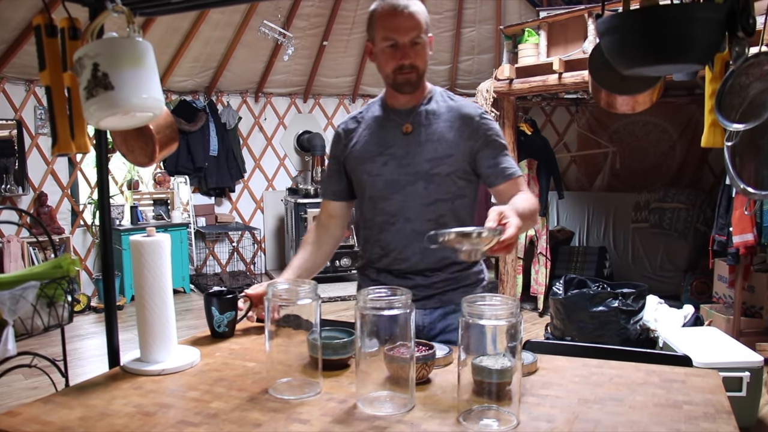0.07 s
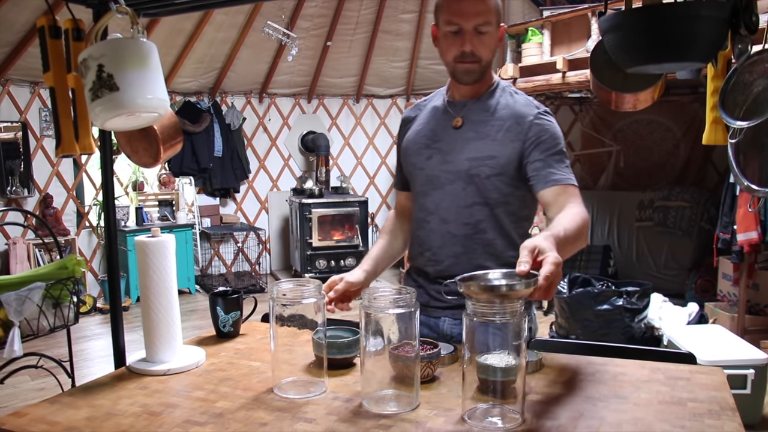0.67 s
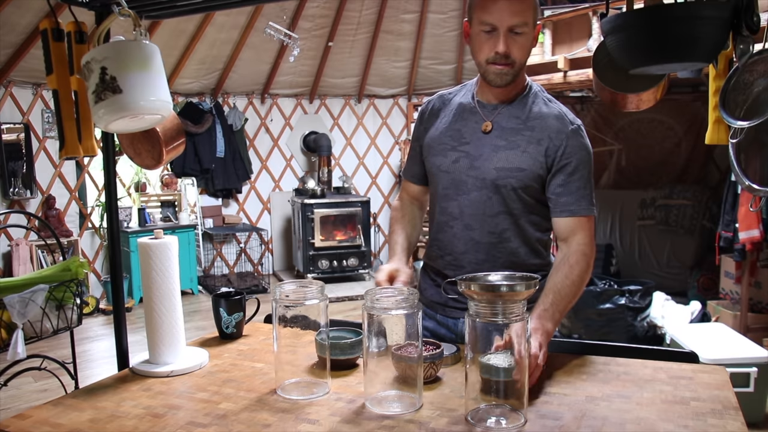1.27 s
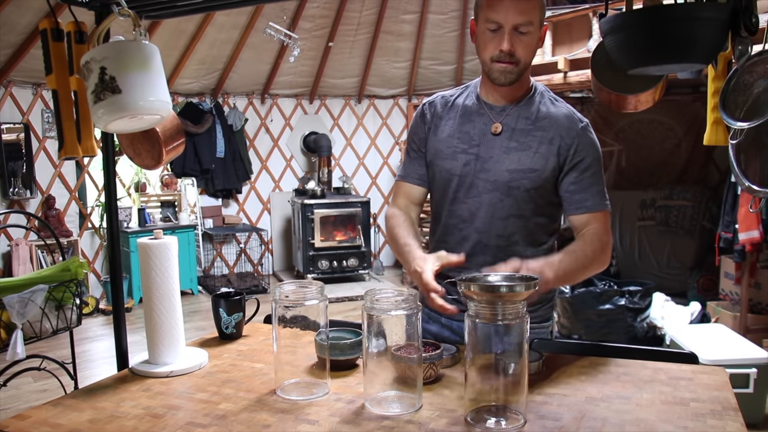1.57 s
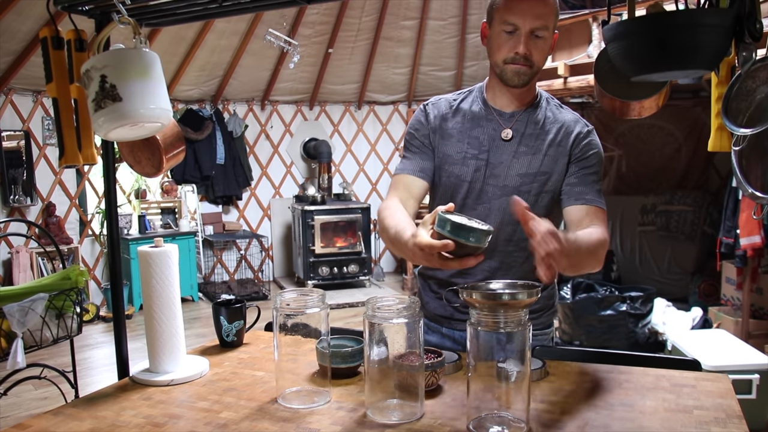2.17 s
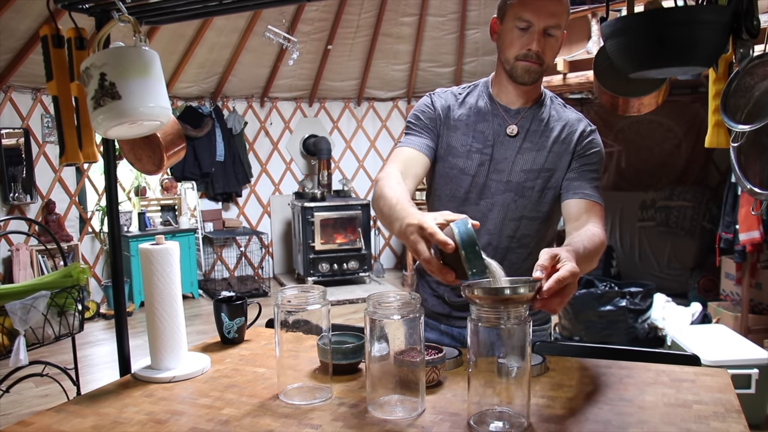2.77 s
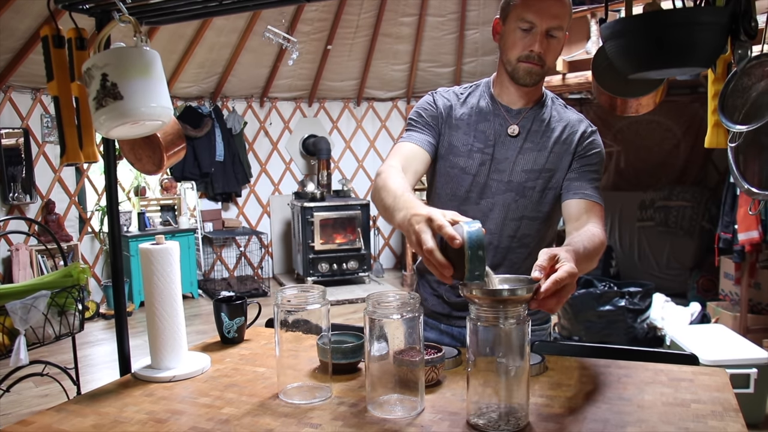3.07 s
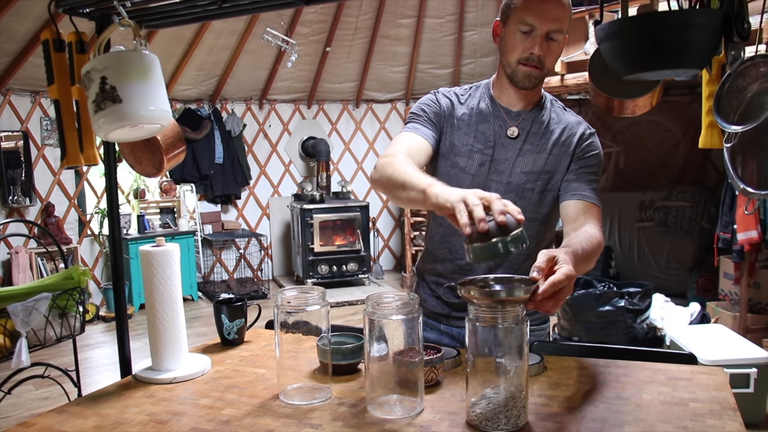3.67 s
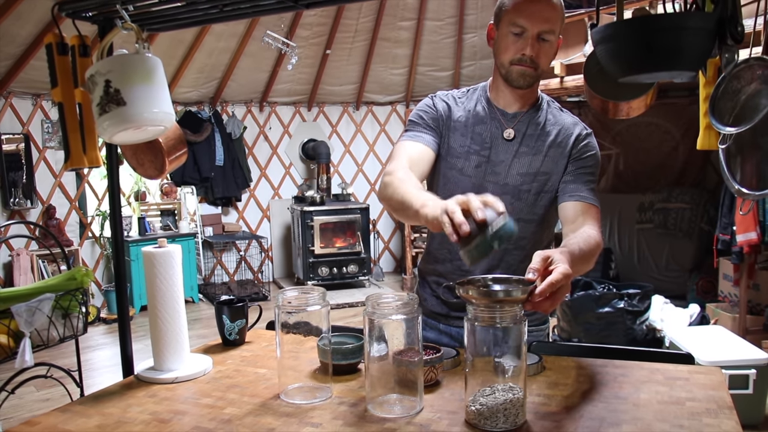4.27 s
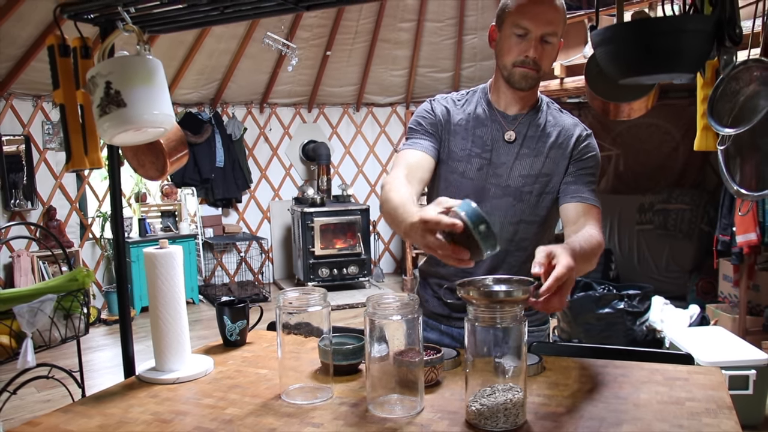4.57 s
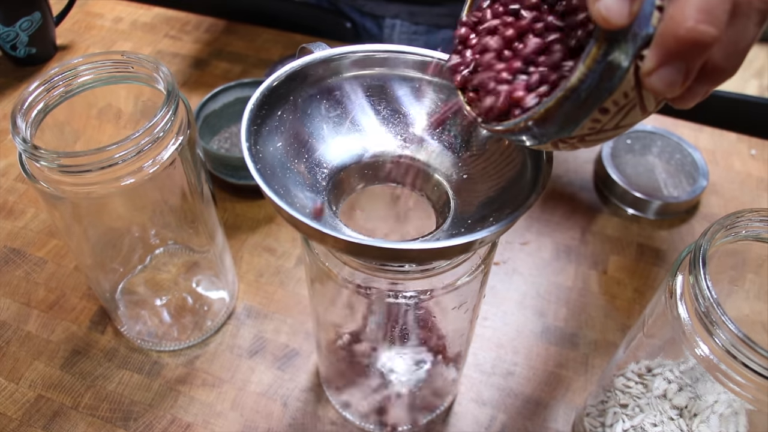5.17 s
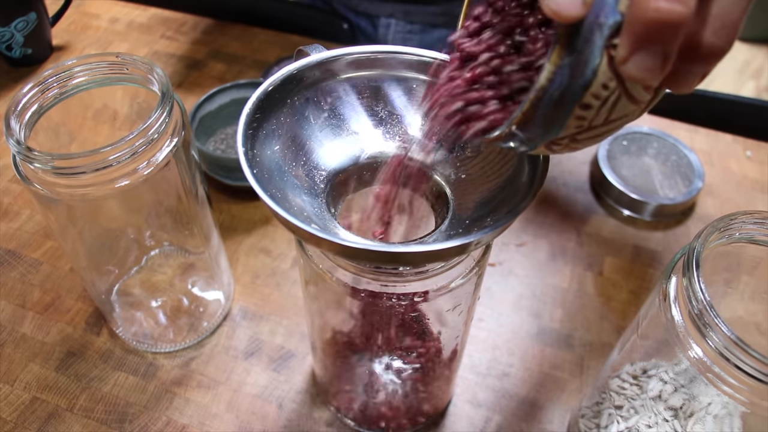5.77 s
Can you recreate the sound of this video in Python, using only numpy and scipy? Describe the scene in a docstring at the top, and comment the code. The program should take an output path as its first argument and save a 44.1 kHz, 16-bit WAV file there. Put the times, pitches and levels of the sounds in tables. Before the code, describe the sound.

A low, even hush fills a small kitchen with little echo, and a few faint bumps and ticks come from things being handled. At about 0.65 seconds a steel funnel drops onto a glass jar, ringing and rattling to rest by 0.9. A very faint squeak follows around 1.1. At 2.6 the funnel knocks again, and light seeds pour through it in a soft, bright rush, ticking on steel and glass. A weaker second tip comes at 3.4, thinning to single ticks until 4.4. Around 4.5 a bowl bumps lightly, and hard dried beans begin sliding over each other. From 4.8 they pour through the funnel, close up and by far the loudest sound, a dense clatter that rings the metal and drums on the bottom of the jar until about 5.8 seconds.

```python
"""A kitchen, small and soft, with one microphone and a limiter near a glass jar on a wooden table.
After a few handling bumps a steel funnel drops into the jar's mouth and rattles to rest; a faint squeak
follows. The funnel knocks again, light seeds are tipped through it from a bowl and the last ones shaken
out. Then, close up, hard dried beans slide off a bowl and pour in.
The grains give short cracks and ring funnel and jar."""
import sys
import numpy as np
from scipy import signal
from scipy.fft import rfft, irfft, next_fast_len
from scipy.io import wavfile
from scipy.ndimage import uniform_filter1d, minimum_filter1d

SR = 44100
rng = np.random.default_rng(int(sys.argv[2]) if len(sys.argv) > 2 else 0)


def generate_wav(signal):
    """Clip the signal to [-1, 1] and save it as 16-bit WAV at the path in sys.argv[1]."""
    frames = np.transpose(np.atleast_2d(signal))
    scaled = np.clip(frames, -1, 1) * 32767
    pcm = np.round(scaled).astype(np.int16)
    wavfile.write(sys.argv[1], SR, pcm)


N = 256662
TIME = np.arange(N) / SR
AGE = TIME[:SR // 2]  # seconds since a strike
BLOW_S = 0.01
FALL_S = 0.12  # from the funnel to the bottom of the jar


def amp(db):
    """Decibels to gain."""
    return 10 ** (np.asarray(db) / 20)


def add(out, t, sound):
    """Mix a sound in at t seconds."""
    i = int(np.clip(round(t * SR), 0, N - 1))
    out[i:i + len(sound)] += sound[:N - i]


def blow(x):
    """Scale to the energy of a full-level sound lasting BLOW_S."""
    return x * np.sqrt(BLOW_S * SR / np.sum(x ** 2, axis=-1, keepdims=True))


def colour(x, spectrum):
    """Causal filter through (f/Hz, level/dB) points, built from the cepstrum."""
    size = next_fast_len(x.shape[-1] // 2 + 2048) * 2
    hz, db = np.transpose(spectrum)
    bins = np.maximum(np.arange(size // 2 + 1) * SR / size, 1)
    gain = amp(np.interp(np.log(bins), np.log(hz), db))
    cepstrum = irfft(np.log(gain))
    cepstrum[1:size // 2] *= 2
    cepstrum[size // 2 + 1:] = 0
    return irfft(rfft(x, size) * np.exp(rfft(cepstrum)))[..., :x.shape[-1]]


def fade(t60):
    """Exponential decay, 60 dB down after t60 seconds."""
    return np.exp(-np.log(1000) * AGE / t60)


def cracks(spectrum, t60, count):
    """Crowds of short modes, different at each point of contact."""
    return blow(colour(rng.standard_normal((count, len(AGE))) * fade(t60), spectrum))


def partials(modes):
    """One dying sine a mode; its level sets its share of the energy."""
    return np.array([amp(db) * blow(np.sin(2 * np.pi * hz * AGE) * fade(t60)) for hz, t60, db in modes])


def rings(modes, scatter_db, count):
    """Each point of contact moves the modes with its own signs and strengths."""
    sign, strength = rng.standard_normal((2, count, len(modes)))
    weights = np.sign(sign) * amp(scatter_db * strength)
    return blow(weights @ partials(modes) * (1 - fade(0.012)))  # the ring takes a moment to spread


def pings(low_hz, high_hz, t60, count):
    """Short, bright tones, a different three at each point of contact."""
    hz = rng.uniform(low_hz, high_hz, (count, 3))
    return blow(np.sin(2 * np.pi * hz[..., None] * AGE).sum(axis=1) * fade(t60))


def shower(flow, banks, spread_db, per_second):
    """A stream of uneven grains; each level column of the flow plays one bank of sounds."""
    s, *levels = np.transpose(flow)
    grains = int((s[-1] - s[0]) * per_second)
    late, chance, spots = rng.random((grains, 3)).T
    times = s[0] + (np.arange(grains) + 2 * late - 1) / per_second
    sizes = amp(-spread_db * np.log(1 - 0.98 * chance))  # many small, a few large
    sizes /= np.sqrt(np.mean(sizes ** 2) * per_second * BLOW_S)
    out = np.zeros(N)
    for t, size, spot in zip(times, sizes, spots):
        for db, bank in zip(levels, banks):
            add(out, t, size * amp(np.interp(t, s, db)) * bank[int(spot * len(bank))])
    return out


def strikes(hits, crack, ring):
    """Single grains hit the bare steel; the level is shared between crack and ring."""
    out = np.zeros(N)
    for k, (t, db, ring_db, *_) in enumerate(hits):
        sound = crack[k % len(crack)] + amp(ring_db) * ring[k % len(ring)]
        add(out, t, amp(db) * sound / np.hypot(1, amp(ring_db)))
    return out


def room_tone():
    """The low, even hush of the kitchen."""
    # colour of the hush: f/Hz, level/dB
    spectrum = [(15, -64), (25, -42), (114, -7.5), (185, -10), (249, -3), (335, -8), (384, -11.5),
                (503, -7.5), (624, -9.5), (754, -13), (863, -15.5), (1330, -25), (4030, -24.5),
                (4870, -31.5), (16000, -39.5)]
    hush = colour(rng.standard_normal(N), spectrum)
    return amp(-65) * hush / np.std(hush)


def room(x):
    """Cloth walls give a short, soft tail behind the direct sound."""
    spectrum = [(60, -8.5), (400, -4), (4000, 5), (16000, -8.5)]  # f/Hz, level/dB
    tail = cracks(spectrum, t60=0.36, count=1)[0] * (1 - fade(0.02))
    return x + amp(-8.5) * signal.fftconvolve(x, tail / np.linalg.norm(tail))[:N]


def squeak():
    """A short rub turns into a faint, unsteady, rising tone."""
    # course of the tone: t/s, f/Hz, level/dB
    glide = [(1.07, 2620, -71), (1.09, 2680, -69), (1.116, 2680, -80), (1.136, 2750, -61),
             (1.185, 2940, -86)]
    # colour of the rub: f/Hz, level/dB
    rub = [(200, -16), (1100, -16), (1450, 0), (1900, -15), (2600, -14), (5000, -32)]
    s, hz, db = np.transpose(glide)
    wobble = uniform_filter1d(rng.standard_normal(N), size=100)
    pitch = np.interp(TIME, s, hz) * (1 + 0.022 * wobble / np.std(wobble))
    level = np.interp(TIME, s, amp(db), left=0, right=0)
    out = np.sqrt(2) * level * np.sin(2 * np.pi * np.cumsum(pitch) / SR)
    add(out, s[0], amp(-48) * cracks(rub, t60=0.17, count=1)[0] * (1 - fade(0.08)))
    return out


def handling():
    """Soft bumps and small ticks as bowls are picked up, shaken and tilted."""
    # hands and bowls bump: t/s, level/dB, centre f/Hz
    bumps = [(.086, -47, 198), (0.119, -45, 112), (0.159, -49, 364), (1.289, -50.5, 426),
             (2.549, -49.5, 497), (3.802, -51.5, 704), (3.903, -43.5, 600), (4.272, -48, 644),
             (4.514, -45, 320), (4.566, -47, 453)]
    # bowls tick: t/s, level/dB, treble tilt/(dB per octave)
    ticks = [(0.085, -47.5, -12), (0.259, -60.5, -8.5), (0.356, -61.5, -7), (.447, -58.5, 4),
             (.99, -60, -8.5), (1.241, -65.5, 0.5), (1.639, -67, -4.5), (2.027, -59, 2), (2.042, -57, -0.5),
             (2.536, -62, -1), (2.549, -62, 6), (4.511, -43, -6.5), (4.566, -44.5, -6), (4.58, -26, 26)]
    # colour of a tick before its tilt: f/Hz, level/dB
    tick_colour = [(100, -26), (1200, -2.5), (3500, 6.5), (8000, -2.5), (16000, -20)]
    out = np.zeros(N)
    for t, db, hz in bumps:
        spectrum = [(hz / 16, -28), (hz, 0), (hz * 64, -63)]  # a broad hump, steeper above
        add(out, t, amp(db) * cracks(spectrum, t60=0.15, count=1)[0])
    for t, db, tilt in ticks:
        spectrum = [(hz, level + tilt * np.log2(hz / tick_colour[0][0])) for hz, level in tick_colour]
        add(out, t, amp(db) * cracks(spectrum, t60=0.076, count=1)[0])
    return out


def funnel():
    """The funnel bounces on the rim: the jar thuds on the table, steel scrapes glass, both ring on."""
    # knocks on the rim, each column on its own scale: t/s, ring/dB, thud/dB, scrape/dB
    knocks = [(0.653, -9, -12, -27), (0.671, -21, -29, -36), (0.684, -8.5, -17.5, -30.5),
              (0.697, -37, -18, -51), (0.736, -26, -26.5, -44), (0.758, -27, -35, -47),
              (0.775, -22, -24.5, -48), (0.82, -24, -48, -45), (0.833, -22.5, -26, -53.5),
              (0.856, -55, -38, -54), (2.566, -41, -26.5, -49.5), (2.584, -21, -28, -46),
              (2.636, -54, -24, -31.5)]
    # modes of the funnel loose on the jar: f/Hz, t60/s, level/dB
    modes = [(260, 0.69, -7.5), (278.5, 0.52, -4.5), (306, .25, -4.5), (342, .4, -13), (492, 0.31, -8.5),
             (793, 0.18, -11.5), (1210, 0.18, -15.5), (1737, 0.69, 3.5), (2040, .25, -14.5),
             (2121, 0.23, -11), (2925, .6, -20), (3043, 1.8, -6), (3120, 1.8, -3), (3173, 1, -12),
             (4470, 3, -20.5), (5981, .4, -19.5), (6200, 1.5, -26), (6930, 0.32, -21), (7000, .4, -20.5),
             (8102, .3, -21.5)]
    # colours of the dense, quickly dying modes: f/Hz, level/dB
    thud_colour = [(25, -50.5), (70, -23), (110, -29), (190, -30.5), (280, 7), (420, -3), (620, -11.5),
                   (1250, -9.5), (2300, -19), (3600, -21.5), (5000, -42)]
    scrape_colour = [(1500, -15), (3200, -4.5), (5000, -19), (6500, 2), (7400, -9.5), (8300, 1.5),
                     (11000, -3), (16000, -5)]
    seated_s, seated_t60_s = 0.79, 0.33
    ring = blow(partials(modes).sum(axis=0))
    thud = cracks(thud_colour, t60=0.089, count=16)
    scrape = cracks(scrape_colour, t60=0.089, count=16)
    out = np.zeros(N)
    for k, (t, ring_db, thud_db, scrape_db) in enumerate(knocks):
        # once seated, the funnel lies against the glass and its ring dies sooner
        seated_for = np.maximum(AGE - max(seated_s - t, 0), 0)
        damping = amp(-60 * seated_for / seated_t60_s)
        contact = amp(thud_db - 8.5) * thud[k] + amp(scrape_db - 1) * scrape[k]
        add(out, t, contact + amp(ring_db - 9) * ring * damping)
    return out


def seed_flow(start, length, db, steel_db, glass_db):
    """One tip of the bowl swells, runs out and stops; rows of t/s, crack/dB, steel/dB, glass/dB."""
    attack_s, release_s, run_out_db_per_s = 0.034, 0.23, 9.5
    off_wall_db_per_s = 2  # the stream moves from the funnel's wall towards its throat
    bare_s, cover_db_per_s = 0.32, 38  # seeds ring the glass until they heap up on it
    age = np.linspace(0, length, 200)
    opening = np.clip(np.minimum(age / attack_s, (length - age) / release_s), 0.01, 1)
    flow = db - run_out_db_per_s * age + 20 * np.log10(opening)
    steel = flow + steel_db - off_wall_db_per_s * age
    landing = np.interp(age - FALL_S, age, flow)
    glass = landing + glass_db - cover_db_per_s * np.maximum(age - bare_s, 0)
    return np.column_stack([start + age, flow, steel, glass])


def seeds():
    """A fine rush of light seeds, on the steel, then on the glass below; it thins to single ticks."""
    # two tips of the bowl: t/s, length/s, flow/dB, share on steel/dB, share on glass/dB
    tips = [(2.64, 0.87, -27, -6, -4.5), (3.421, 0.38, -34.5, -4, -7)]
    # clumps, then the last seeds shaken loose: t/s, relative level/dB, ring over crack/dB
    hits = [(2.654, -20, -2), (2.672, -24, -7), (2.7232, -33, -27), (2.7454, -13, -30), (2.7613, -11.5, 1),
            (2.8095, -14, -31), (3.0813, -25, -19), (3.1178, -30, -3), (3.1358, -22, -24), (3.4773, -17, 1),
            (3.5127, -18, 4), (3.5364, -20.5, 8), (3.6472, -19.5, 10), (3.7146, -23.5, 8),
            (3.7933, -21.5, -1), (3.8322, -17, 1.5), (3.8724, -27, 14), (3.903, -29, 5), (3.9217, -19, -10),
            (3.9813, -37, 12), (4.0044, -40, 15), (4.055, -30, -6), (4.0822, -24.5, 4), (4.0946, -22, -3),
            (4.1449, -22.5, -1), (4.1795, -37, -1), (4.3907, -32, 3), (4.4164, -56, -9)]
    # colour of a seed's crack: f/Hz, level/dB
    crack_colour = [(25, -49), (90, -46), (300, -15), (1000, -14), (2500, -17), (3600, -11.5), (4400, -13),
                    (5400, -15.5), (6700, -3.5), (7500, -9), (8400, 1), (10000, 0.5), (12000, -2),
                    (16000, -5.5)]
    # modes of the hand-held funnel and of the jar: f/Hz, t60/s, level/dB
    funnel_modes = [(324, 0.081, -22), (501, 0.1, -23), (1508, 0.045, -12), (1753, 0.22, -19),
                    (2187, 0.03, -10), (3095, 0.06, -6), (3156, 0.089, -7), (5672, 0.027, -17),
                    (5977, 0.108, -12), (6264, 0.025, -4), (6551, 0.116, -11), (7002, 0.023, -11),
                    (8038, 0.06, 0), (8332, 0.025, -9), (9450, 0.15, -15), (10489, 0.086, -16),
                    (12100, 0.041, -10), (13117, 0.072, -9), (15618, 0.037, -12)]
    jar_modes = [(2925, 0.15, 0), (4773, 0.061, -11), (4948, 0.03, -14), (5092, 0.049, -12)]
    crack = cracks(crack_colour, t60=0.049, count=40)
    steel = amp(3) * rings(funnel_modes, scatter_db=1.5, count=40)
    glass = rings(jar_modes, scatter_db=0, count=40)
    stream = sum(shower(seed_flow(*tip), [crack, steel, glass], spread_db=4.5, per_second=650)
                 for tip in tips)
    # a lone seed rings the steel at a pitch that depends on where it lands
    ring = amp(-0.5) * rings(funnel_modes, scatter_db=6.5, count=30)
    ring += amp(-10) * pings(low_hz=2938, high_hz=3500, t60=0.075, count=30)
    return stream + amp(-10) * strikes(hits, crack, ring)


def bean_slide():
    """Beans slide over each other in the tilted bowl."""
    # swell of the slide: t/s, level/dB
    flow = [(4.60, -63), (4.632, -63), (4.638, -35.5), (4.70, -38), (4.75, -41), (4.82, -30)]
    # colour of a contact in the bowl: f/Hz, level/dB
    bowl_colour = [(100, -28), (600, -24), (1300, -7), (2200, -1.5), (2700, -10.5), (3900, 10.5),
                   (4600, -7), (5700, -7), (6800, 2.5), (8800, -8), (10600, -2), (13500, -3), (14600, 4),
                   (16000, -4.5)]
    clicks = amp(0.5) * cracks(bowl_colour, t60=0.013, count=12)
    return shower(flow, [clicks], spread_db=4.5, per_second=700)


def bean_flow():
    """Beans hit the funnel's wall, then the glass; rows of t/s, crack/dB, steel/dB, glass/dB, thump/dB."""
    # the stream of beans: t/s, flow/dB, force on the wall/dB
    stream = [(4.845, -2, -36), (4.849, -8, -25.5), (5.067, -15.5, -36), (5.273, -15, -37.5),
              (5.327, -20.5, -74), (5.351, -15.5, -34), (5.571, -17.5, -37.5), (5.611, -16, -40),
              (5.701, -17, -31.5), (5.753, -17, -44.5), (5.801, -15.5, -39), (5.82, -8, -24)]
    cover_db_per_s = 1.5  # the growing heap damps the jar
    points, *levels = np.transpose(stream)
    s = np.linspace(points[0], points[-1], 200)
    flow, wall = (np.interp(s, points, db) for db in levels)
    age = s - s[0]
    landed = np.clip(age / FALL_S, 0.1, 1)
    glass = flow + 20 * np.log10(landed) - cover_db_per_s * age
    return np.column_stack([s, flow, wall, glass, wall])


def beans():
    """Close up, beans clatter through the funnel, thump the table and drum on the bottom of the jar."""
    # hardest strikes: t/s, relative level/dB, ring over crack/dB, thump/dB
    hits = [(4.7611, -17.5, 14, -35.5), (4.7734, -17, 14, -34.5), (4.798, -10, 5, -40),
            (4.8179, 3.5, 5, -33), (4.8657, 8.5, -5, -13), (4.884, 11, 1, -22), (5.0649, 2, -22, -24),
            (5.092, 0, -11, -23), (5.3857, 0, 5, -47), (5.256, -3.5, 4, -29), (5.349, -4.5, 2, -31),
            (5.5085, -19, -1, -41), (5.597, 0.5, 15, -39), (5.6962, -4.5, -1, -38),
            (5.789, -4, -4.5, -35.5)]
    # square landings on the glass: t/s, low ring/dB, high ring/dB
    glass_hits = [(4.972, -10.5, -19), (5.091, -43, 3), (5.129, -4, 1), (5.15, -11, -32), (5.263, -14, -16),
                  (5.365, -42, -4), (5.792, -32, -2)]
    # colours of a bean's crack and the table's thump: f/Hz, level/dB
    crack_colour = [(200, -25), (1000, -23), (1900, -11), (3600, -7.5), (4500, -10.5), (5500, -7.5),
                    (7500, -3.5), (8400, 4.5), (9100, -8), (10000, 1), (12600, -4), (14200, -0.5),
                    (16000, 1)]
    thump_colour = [(20, -6), (45, -5.5), (130, -4), (270, 1), (400, 0), (800, -3), (1300, 2),
                    (2000, -21.5)]
    # modes of the funnel resting free and of the jar: f/Hz, t60/s, level/dB
    funnel_modes = [(1248, 0.024, -14), (1329, 0.03, -10), (1779, 0.098, -15), (2192, 0.018, -12),
                    (3027, 0.15, -15), (3140, 0.061, -7), (5690, 0.05, -8), (5965, 0.067, -16),
                    (6340, 0.065, 0), (6539, 0.22, -12), (6826, 0.219, -12), (6982, 0.025, -7),
                    (8072, 0.018, -1), (8317, 0.032, -3), (8668, 0.018, 0), (9466, 0.084, -5),
                    (9673, 0.018, -1), (9937, 0.037, -6), (10124, 0.041, -2), (10710, 0.031, -8),
                    (10918, 0.092, -11), (12032, 0.018, -1), (13103, 0.041, -10), (13525, 0.025, -4),
                    (15645, 0.021, -1)]
    jar_modes = [(2607, 0.048, -13), (2872, 0.19, -5), (4878, 0.045, -15), (5044, 0.05, -10),
                 (11098, 0.05, -12), (11578, 0.064, 0)]
    crack = cracks(crack_colour, t60=0.06, count=60)
    thump = cracks(thump_colour, t60=0.06, count=60)
    steel = rings(funnel_modes, scatter_db=6.5, count=60)
    glass = rings(jar_modes, scatter_db=2.5, count=60)
    # each bean picks out a few of the dense treble modes
    treble = pings(low_hz=7980, high_hz=14170, t60=0.062, count=60)
    banks = [amp(0.4) * crack + amp(-2.5) * treble, amp(18.5) * steel, amp(-2.5) * glass, thump]
    out = shower(bean_flow(), banks, spread_db=2, per_second=230)
    for (t, _, _, thump_db), sound in zip(hits, thump):
        add(out, t, amp(thump_db) * sound)
    jar = partials(jar_modes) * (1 - fade(0.056))
    is_low = np.array(jar_modes)[:, 0] < 8000
    for t, low_db, high_db in glass_hits:
        add(out, t, amp(np.where(is_low, low_db, high_db)) @ jar)
    return out + amp(-6.5) * strikes(hits, crack, steel)


def scene():
    """Everything reaches one microphone, the same in both channels."""
    # the funnel and the seeds carry no deep bass
    low_cut = signal.butter(4, 160, "high", fs=SR, output="sos")
    light = signal.sosfilt(low_cut, funnel() + seeds())
    direct = light + handling() + squeak() + bean_slide() + beans()
    return np.tile(room(direct) + room_tone(), (2, 1))


def record(dry):
    """A fast limiter holds the hardest strikes down; the top is cut steeply before and after it."""
    top_hz, ceiling, window = 15750, amp(-3), 221  # window in samples, 5 ms
    high_cut = signal.ellip(12, 0.1, 80, top_hz, fs=SR, output="sos")
    heard = signal.sosfilt(high_cut, dry)
    gain = ceiling / np.maximum(np.abs(heard).max(axis=0), ceiling)
    gain = uniform_filter1d(minimum_filter1d(gain, window), window)
    return signal.sosfilt(high_cut, heard * gain)


dry = scene()
out = record(dry)
generate_wav(out)
```